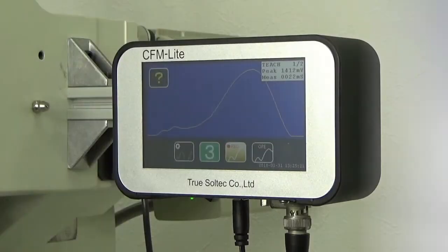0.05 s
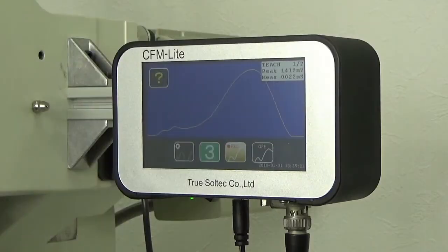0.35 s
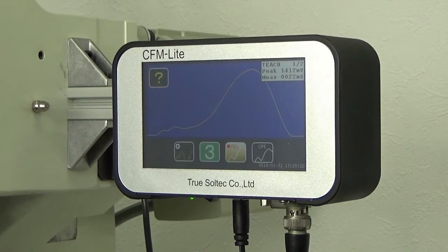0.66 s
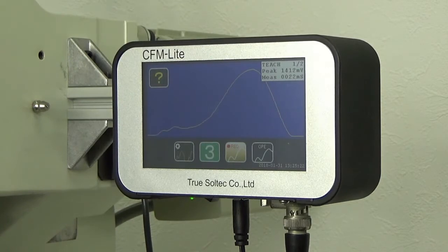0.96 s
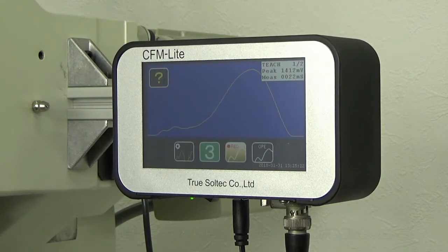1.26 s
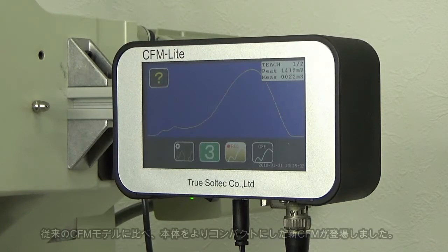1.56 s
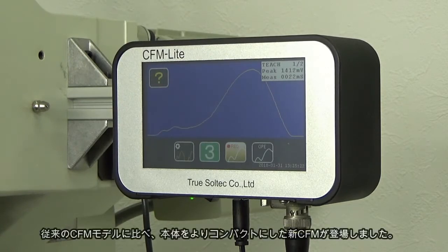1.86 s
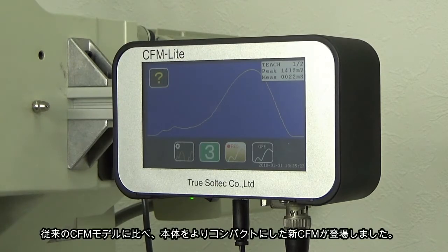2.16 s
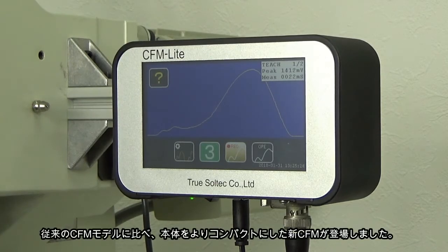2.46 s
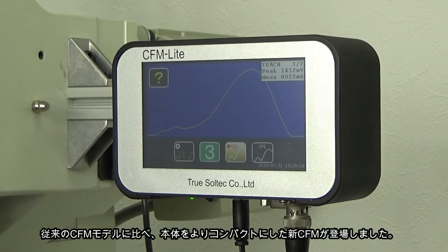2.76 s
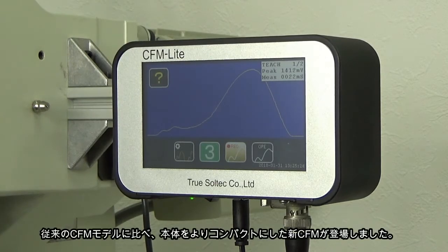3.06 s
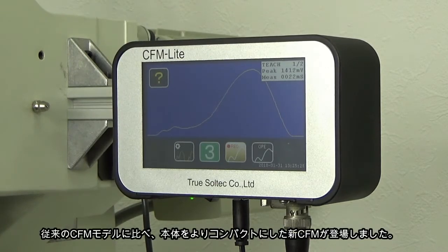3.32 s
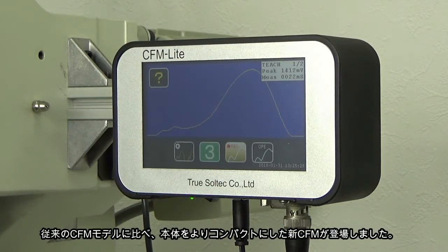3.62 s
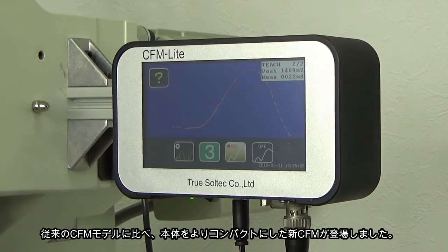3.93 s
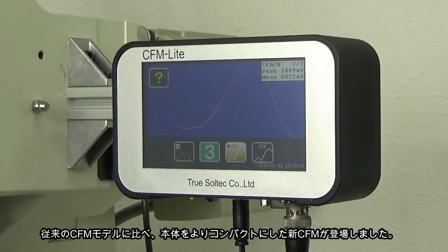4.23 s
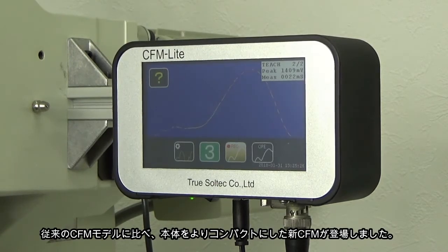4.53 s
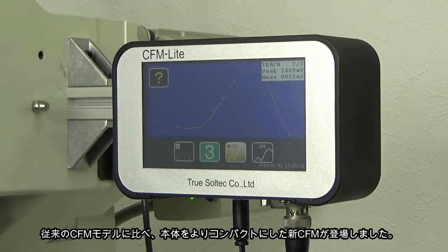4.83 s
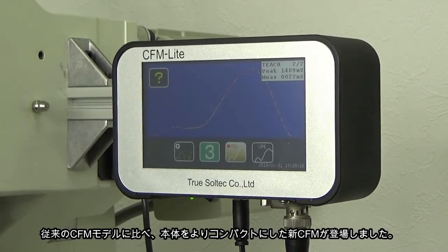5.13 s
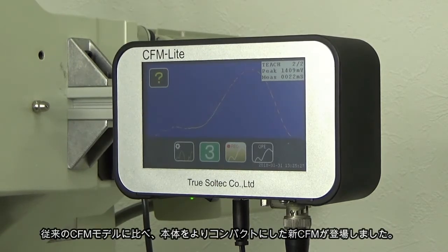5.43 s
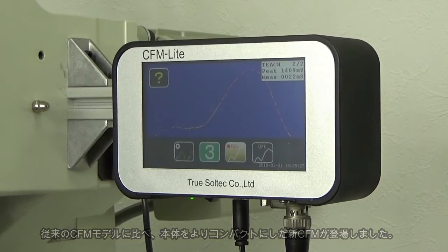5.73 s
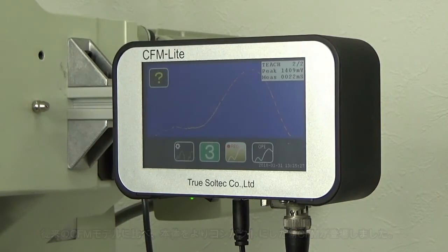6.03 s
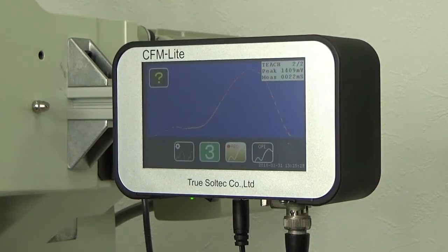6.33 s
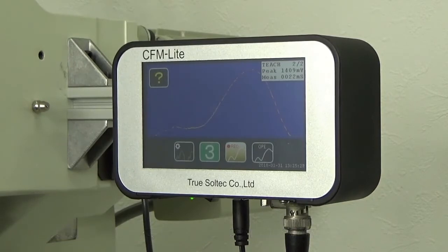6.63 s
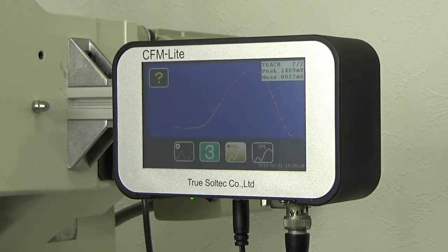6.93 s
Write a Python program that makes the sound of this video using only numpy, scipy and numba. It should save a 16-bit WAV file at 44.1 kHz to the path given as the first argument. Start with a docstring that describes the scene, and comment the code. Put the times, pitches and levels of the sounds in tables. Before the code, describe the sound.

A crimping press makes one loud, rattling metal clunk over a low motor hum, with small button clicks before and a dull knock after.

```python
"""A small workshop: a crimping press idles with a low motor hum, then makes one stroke. The clutch snaps in,
the ram slides and slams down, steel squawks, the cast frame thuds and the bright tooling rattles out.
Loose metal ticks and settles, and a latch drops back a second later. The hum dips and slowly comes back,
joined by a faint electronic ticking. Now and then a small sprung button is pressed and let go.
The sound is close, and a limiter holds the stroke down."""
import sys
import numpy as np
from scipy import signal
from scipy.fft import rfft, irfft
from scipy.io import wavfile
from scipy.ndimage import uniform_filter1d
from numba import njit

SR = 44100
rng = np.random.default_rng(int(sys.argv[2]) if len(sys.argv) > 2 else 0)


def store_wav(level_fs):
    """Save 16-bit WAV to argv[1]."""
    pcm = np.round(np.clip(np.atleast_2d(level_fs), -1, 1) * 32767)
    wavfile.write(sys.argv[1], SR, pcm.T.astype(np.int16))


N = 316638
T = np.arange(N) / SR
RING_T = T[:int(1.5 * SR)]  # time axis of rings and echoes
HUM_DIP_START_S, HUM_DIP_HOLD_S, HUM_DIP_ATTACK_S = 3.8, 0.7, 0.11

# bright colour of steel hitting steel: f/Hz, level/dB
CLASH_COLOUR = [(100, -37), (1000, -19), (2500, -4.5), (3700, -12), (4700, -6), (5700, 3.5), (8000, -0.5),
                (9700, -8), (12200, -1), (13500, -20), (16000, -17.5)]
# ring of the loose metal parts: f/Hz, level/dB, t60/s
LOOSE_METAL_MODES = [(3620, -12, 0.057), (6780, 0, 0.057), (8120, -11, 0.093), (11500, -13, 0.06),
                     (13400, -8, .03)]


def press(frame_t60=0.064, tooling_ring_s=0.0018):
    """Every blow shakes the heavy frame and rattles the bright tooling; the room answers both."""
    # main blows of the stroke: t/s, frame thud/dB, tooling clash/dB, contact chatter/s
    blows = [(3.6175, -33, -63, 0.00076), (3.634, -22.5, -21.5, 0.005), (3.711, -7, -11.5, 0.005),
             (3.753, -26, -4, 0.0021), (3.777, -10.5, -11, 0.0011), (3.814, -14.5, -35, 0.0011),
             (3.821, -7.5, -10, 0.002), (3.834, -19, -3.5, 0.007), (3.847, -16, -9.5, 0.0043),
             (3.871, -15.5, -8.5, .003), (3.902, -18, -18, 0.0057), (3.939, -19, -18, .006),
             (4.033, -34, -26.5, 0.0056), (4.05, -29.5, -29, 0.0026), (4.07, -34, -28.5, .003)]
    # body of the frame's thud: f/Hz, level/dB
    thud_colour = [(30, -45), (70, -7.5), (130, -5.5), (290, -8), (450, 1.5), (820, 4.5), (1400, -0.5),
                   (2000, -9), (2700, -9), (4000, -9), (8000, -13.5), (16000, -53)]
    # ring of the cast frame: f/Hz, level/dB, t60/s
    frame_modes = [(172.3, 5, 0.2), (212.4, -1, 0.78), (413.6, -1.5, 1), (599, 1.5, 0.43), (755, -4, 0.73),
                   (812, -5, 0.52), (896, 5, 0.36), (1075, -5, 0.58), (1392, 3, 0.44), (2030, -2, 0.59)]
    # long ring of the steel tooling: f/Hz, level/dB, t60/s
    tooling_modes = [(5450, 0, .7), (6009, -2, .55), (7140, -5, 0.53), (8263, -3, 0.77)]
    times, thud_db, clash_db, chatter_s = np.vstack([blows, bounces()]).T
    thud = contacts(times, thud_db, chatter_s, rise_s=0.00051)
    clash = contacts(times, clash_db, chatter_s + tooling_ring_s, rise_s=0.000098)
    dense_modes = rng.standard_normal(len(RING_T)) * fade(frame_t60)
    frame = colour(convolve(thud, dense_modes + undb(-14.5) * room_tail()), thud_colour)
    frame_ring = convolve(taps(times, thud_db), undb(-25) * modes(frame_modes))
    tooling = undb(20) * colour(in_room(clash, wet_db=-41.5), CLASH_COLOUR)
    steel_ring = undb(-19) * modes(LOOSE_METAL_MODES) + undb(-31.5) * modes(tooling_modes)
    jingle = convolve(taps(times, clash_db), steel_ring)
    return frame + frame_ring + tooling + jingle


def bounces(count=40, gap_s=.0115, jitter=.15, scatter_db=3, chatter_s=0.0049):
    """Quick, uneven rebounds of the tooling that die away, as further rows of blows."""
    # rattles after the two hardest clashes: t/s, length/s, first thud/dB, first clash/dB
    rattles = [(3.761, .017, -33, -5), (3.845, 0.22, -20, -13)]
    thud_fall_db_per_s, clash_fall_db_per_s = 99, 129
    rows = []
    for start, length, first_thud_db, first_clash_db in rattles:
        for k, (late, thud_luck, clash_luck) in enumerate(rng.standard_normal((count, 3))):
            age = gap_s * (k + jitter * late)
            if age < length:
                thud_db = first_thud_db - thud_fall_db_per_s * age + scatter_db * thud_luck
                clash_db = first_clash_db - clash_fall_db_per_s * age + scatter_db * clash_luck
                rows.append((start + age, thud_db, clash_db, chatter_s))
    return rows


def slide(peak_s=3.766, peak_db=-24, rise_db_per_s=156, fall_db_per_s=30.5, stop_s=4.3):
    """Dry steel catches and slips in dense, uneven grains, loudest as the ram passes mid-stroke."""
    # scrape of the ram: f/Hz, level/dB
    scrape_colour = [(100, -24), (500, 0), (1000, 5), (2000, -5.5), (2900, -6.5), (4000, -6), (4800, -9),
                     (6200, -3.5), (8400, -4.5), (9800, -23), (12000, -14), (16000, -27)]
    grain_db, uneven_db, after_stop_db = 2.5, 1.85, -5
    grains = unit(stereo_noise(N, side_db=-37) * undb(grain_db * rng.exponential(size=N)))
    age = T - peak_s
    swell_db = np.minimum(rise_db_per_s * age, -fall_db_per_s * age)
    level_db = peak_db + swell_db + after_stop_db * (T > stop_s)
    return colour(grains * undb(level_db + uneven_db * walk(70)), scrape_colour)


def squawk(width_hz=650):
    """Rough stick-slip rings one broad resonance, which rises while the ram bears down."""
    # a groan, then two squawks of loaded steel: t/s, length/s, f/Hz, glide/(Hz/s), level/dB
    squawks = [(3.529, 0.072, 650, 0, -51), (3.664, 0.046, 1800, 2500, -36),
               (3.715, .038, 1560, 15003, -23.5)]
    out = 0
    for start, length, hz, glide, db in squawks:
        phase = 2 * np.pi * np.cumsum(hz + glide * np.clip(T - start, 0, length)) / SR
        gate = envelope(start, length, attack_s=0.0026, release_s=.003)
        out = out + undb(db) * noise_band(phase, width_hz) * gate
    return out


def ram_stop(at_s=4.291, level_db=-35):
    """The returning ram meets its stop with a bright clink."""
    # ring of the end stop: f/Hz, level/dB, t60/s
    stop_modes = [(3770, -0.5, 0.091), (5109, -5, .07), (6170, 1.5, .085)]
    return in_room(convolve(taps(np.array([at_s]), level_db), modes(stop_modes)), wet_db=-44)


def latch(at_s=4.815):
    """The latch drops back softly with a dull knock."""
    # body of the knock: f/Hz, level/dB
    knock_colour = [(90, -15), (195, 8), (330, -0.5), (1100, 3), (2200, -11.5), (6200, -4), (9500, -16),
                    (16000, -36)]
    drop = contacts([at_s], levels_db=[-6], length_s=0.01, rise_s=.014)
    return in_room(colour(drop, knock_colour), wet_db=-33)


def button(click_db=-37.5, snap_ring_db=1.5, return_ring_db=-11.5):
    """A small spring creeps, snaps over and bounces; it rings on the snap and hardly on the return."""
    # finger presses: t/s, time held down/s
    presses = [(.6042, 0.07), (.767, .064), (1.3868, .067), (1.6531, 0.079), (1.8118, 0.076),
               (1.966, 0.076), (2.53, .089), (2.7128, 0.086), (7.056, .054)]
    # crisp edge of the click: f/Hz, level/dB
    click_colour = [(500, -29), (2900, -12.5), (3600, -1), (5300, -10), (6500, -2.5), (7800, 3.5),
                    (9900, -14.5), (11400, -5), (12400, -15), (13500, -7), (16000, -33)]
    # ping of the spring: f/Hz, level/dB, t60/s
    spring_modes = [(6500, -12.5, 0.03), (7790, -13, 0.04), (7837, 3.5, 0.024), (11200, -15.5, 0.028)]
    # ring of the button's case: f/Hz, level/dB, t60/s
    case_modes = [(3550, -22, 0.12), (6210, -18.5, .12), (13550, -25, 0.17), (13800, -27, .12)]
    # two light touches, the snap and its bounce: lag/s, level/dB
    steps = [(-.009, -12), (-.0045, -6), (0, 0), (.0105, -12)]
    down, held = np.transpose(presses)
    times = np.r_[down, down + held]
    db = np.full(len(times), click_db)
    ring_db = np.repeat([snap_ring_db, return_ring_db], len(down))
    knocks = plucks = 0
    for lag, step_db in steps:
        knocks = knocks + contacts(times + lag, db + step_db, length_s=0.0046, rise_s=0.0005)
        plucks = plucks + taps(times + lag, db + step_db + ring_db)
    click = in_room(undb(13) * colour(knocks, click_colour), wet_db=-35)
    case = convolve(taps(times, db), modes(case_modes))
    spring = in_room(convolve(plucks, modes(spring_modes)), wet_db=-42)
    return click + case + spring


def ticks():
    """Loose bits of metal tick, some with a short high ping or a thin chink."""
    # the clearer ticks: t/s, level/dB, relative ping/dB, relative chink/dB, contact length/s
    hits = [(0.4053, -45, -25, -25, .002), (1.2978, -42.5, -25, -25, 0.0014),
            (1.524, -46, -22, -30, 0.0055), (3.531, -42, -20, -25, 0.0042), (4.246, -29.5, 2, -10, .004),
            (4.288, -26.5, -10, -3, .011), (4.7596, -42.5, -20, -4, 0.0053), (5.644, -41, -18, -22, 0.0077),
            (5.7603, -44.5, -22, -6, 0.0036), (5.893, -43, -24, -25, 0.0094)]
    # thin, high chink: f/Hz, level/dB, t60/s
    chink_modes = [(13600, -12, .04), (14250, -6, .04), (15100, -12, .03)]
    times, db, ping_db, chink_db, length_s = np.transpose(hits)
    tick = undb(18) * colour(contacts(times, db, length_s, rise_s=0.00081), CLASH_COLOUR)
    ping = convolve(taps(times, db + ping_db), modes(LOOSE_METAL_MODES))
    chink = convolve(taps(times, db + chink_db), modes(chink_modes))
    return in_room(tick + ping + chink, wet_db=-39)


def settling(start_s=4.35, span_s=1.9, count=8, push_db=-43, fall_db_per_s=3.5):
    """Stray, faint tinkles that grow weaker as the loose parts come to rest."""
    # short ring of the settling parts: f/Hz, level/dB, t60/s
    tinkle_modes = [(6230, 2.5, 0.017), (6550, 2, .025), (8450, -0.5, .015)]
    age = span_s * (np.arange(count) + rng.random(count)) / count
    pushes = contacts(start_s + age, push_db - fall_db_per_s * age, length_s=0.0037, rise_s=.001)
    return in_room(convolve(pushes, modes(tinkle_modes)), wet_db=-31.5)


def motor(hum_hz=275.6, hum_db=-54, dip_db=3.5, recover_s=1.5, waver_db=1.5, wander_rad=0.05):
    """One firm hum over the housing's noisy whirr; the hum dips after the stroke and slowly comes back."""
    # housing resonances stirred by the running drive: f/Hz, rms level/dB
    housing = [(38, -63.5), (95, -67), (206, -64.5), (373, -65.5), (410, -65.5), (648, -67.5), (858, -66),
               (964, -66), (1147, -72.5), (1265, -70.5), (1445, -73.5)]
    dip = envelope(HUM_DIP_START_S, HUM_DIP_HOLD_S, HUM_DIP_ATTACK_S, recover_s)
    level_db = hum_db - dip_db * dip + waver_db * walk(12)
    out = np.sqrt(2) * undb(level_db) * np.sin(2 * np.pi * hum_hz * T + wander_rad * walk(2.7))
    whirr = undb(waver_db * walk(9))
    for hz, db in housing:
        gain = undb(db + 1.8 * walk(3)) * whirr
        out = out + gain * noise_band(2 * np.pi * hz * T, width_hz=8 + hz / 42)
    return out


def fan(level_db=-54.5, rise_db=1.0):
    """Even rush of the motor's fan with a fine hiss, a little stronger after the stroke."""
    # moving air: f/Hz, level/dB
    air_colour = [(15, -3.5), (35, -3), (110, -2.5), (160, -4.5), (500, -8), (1300, -11.5), (1800, -19),
                  (4800, -24), (5900, -15.5), (7200, -21.5), (15500, -29.5)]
    rush = colour(stereo_noise(N, side_db=-19), air_colour)
    return rush * undb(level_db + rise_db * np.clip(T - 4, 0, 1))


def electronic_ticking(start_s=4.694, rate_hz=30, level_db=-59.5, scatter_db=1.0):
    """A faint, regular electronic ticking, 30 times a second, after the stroke."""
    tick_modes = [(2426, -0.92, 0.032), (3010, -1.5, 0.032)]  # f/Hz, level/dB, t60/s
    times = np.arange(start_s, T[-1], 1 / rate_hz)
    pulses = taps(times, level_db + scatter_db * rng.standard_normal(len(times)))
    return convolve(pulses, modes(tick_modes))


def room_tail(count=10, build_t60=0.0098):
    """Diffuse echo that builds up quickly; each band dies at its own rate."""
    # decay of the workshop: f/Hz, t60/s
    decay = [(100, 0.62), (400, 0.82), (1200, 0.74), (4000, 0.49), (8000, 0.5), (11000, 0.26),
             (16000, 0.16)]
    noise = rfft(stereo_noise(len(RING_T), side_db=-30))
    hz = np.linspace(0, SR / 2, noise.shape[1])
    centres = np.geomspace(decay[0][0], decay[-1][0], count)
    tail = 0
    for centre, share in zip(centres, np.eye(count)):
        band = irfft(noise * at_hz(np.c_[centres, share], hz))
        tail = tail + band * fade(at_hz(decay, centre))
    return tail * (1 - fade(build_t60))


def in_room(x, wet_db):
    """The direct sound and its echo."""
    return x + convolve(x, undb(wet_db) * room_tail())


def contacts(times, levels_db, length_s, rise_s):
    """Each contact is a burst of tiny impacts that builds up and dies away; its level sets its energy."""
    force = np.zeros((2, N + len(RING_T)))
    t = RING_T[:SR // 10]
    for start, db, length in zip(times, levels_db, np.broadcast_to(length_s, len(times))):
        impacts = stereo_noise(len(t), side_db=-25) * undb(1.35 * rng.exponential(size=len(t)))
        burst = impacts * np.exp(-t / max(length, 1 / SR)) * (1 - np.exp(-t / rise_s))
        force[:, int(start * SR):][:, :len(t)] += undb(db) * burst / np.linalg.norm(burst[0])
    return force[:, :N]


def taps(times, levels_db):
    """Single sharp pulses."""
    force = np.zeros(N)
    force[(times * SR).astype(int)] = undb(levels_db)
    return force


def modes(rows):
    """A ring made of decaying sines."""
    return sum(undb(db) * np.sin(2 * np.pi * (hz * RING_T + rng.random())) * fade(t60)
               for hz, db, t60 in rows)


def fade(t60):
    """Decay that loses 60 dB in t60 seconds."""
    return np.exp(-np.log(1000) * RING_T / t60)


def envelope(start_s, hold_s, attack_s, release_s):
    """Rise, hold, then die away."""
    age = np.maximum(T - start_s, 0)
    return (1 - np.exp(-age / attack_s)) * np.exp(-np.maximum(age - hold_s, 0) / release_s)


def walk(rate_hz):
    """Smooth random drift of rms 1."""
    step = int(SR / rate_hz)
    stairs = np.repeat(rng.standard_normal(N // step + 1), step)
    return unit(uniform_filter1d(stairs, step)[:N])


def noise_band(phase, width_hz):
    """Pitched noise around a carrier."""
    return walk(width_hz) * np.sin(phase) + walk(width_hz) * np.cos(phase)


def stereo_noise(size, side_db):
    """Noise that is nearly alike at two close microphones."""
    mid, side = rng.standard_normal((2, size))
    return mid + undb(side_db) * side * np.array([[1], [-1]])


def colour(x, points, size=4096):
    """Minimum-phase EQ through (f/Hz, level/dB) points that keeps the power of white noise."""
    hz = np.arange(size // 2 + 1) * SR / size
    cepstrum = irfft(np.log(undb(at_hz(points, hz))))
    cepstrum[1:size // 2] *= 2
    cepstrum[size // 2 + 1:] = 0
    response = irfft(np.exp(rfft(cepstrum)))
    return convolve(x, response / np.linalg.norm(response))


def convolve(x, response):
    """Play x through a mono or stereo response."""
    return signal.fftconvolve(np.atleast_2d(x), np.atleast_2d(response), axes=1)[:, :N]


def at_hz(points, hz):
    """Read (f/Hz, value) points on a log-frequency axis."""
    f, value = np.transpose(points)
    return np.interp(np.log(np.maximum(hz, 1)), np.log(f), value)


def undb(db):
    """Decibels to gain."""
    return 10 ** (np.asarray(db) / 20)


def unit(x):
    """Scale to rms 1."""
    return x / np.sqrt(np.mean(x ** 2))


@njit
def follow(x, attack_s, release_s):
    """Envelope that rises and falls at different speeds."""
    out, level = np.empty(len(x)), 0.
    for i in range(len(x)):
        level += (x[i] - level) / (1 + SR * (attack_s if x[i] > level else release_s))
        out[i] = level
    return out


def hold_down(x, top_db, attack_s, release_s):
    """Turn the gain down while the envelope is over the top."""
    level = follow(np.abs(x).max(axis=0), attack_s, release_s)
    return x / np.maximum(level / undb(top_db), 1)


def scene():
    """The machine stands a little to the left, which shows most in the low mids."""
    # stereo image: f/Hz, left minus right/dB, side gain/dB
    image = np.array([(40, 0, -2), (170, 5, 6), (280, 2.8, 3), (1100, 1.8, 1), (2400, .3, -4),
                      (8000, .2, 5), (11000, 0, -20)])
    action = press() + slide() + squawk() + latch() + button() + ticks() + ram_stop() + settling()
    left, right = rfft(action + motor() + electronic_ticking() + fan())
    hz = np.arange(len(left)) * SR / N
    lean_db, width_db = (at_hz(image[:, [0, k]], hz) for k in (1, 2))
    signs = np.array([[1], [-1]])
    mid = (left + right) / 2
    side = (left - right) / 2 * undb(width_db)
    return irfft((mid + signs * side) * undb(signs * lean_db / 2), N)


def record(dry, top_hz=15850):
    """A quick limiter, a slow gain control and a steep top cut."""
    limited = hold_down(dry, top_db=-8.0, attack_s=0.0001, release_s=0.013)
    ridden = hold_down(limited, top_db=-16.0, attack_s=0.057, release_s=1.5)
    return signal.sosfilt(signal.ellip(10, .2, 80, top_hz, fs=SR, output="sos"), ridden)


dry = scene()
out = record(dry)
store_wav(out)
```